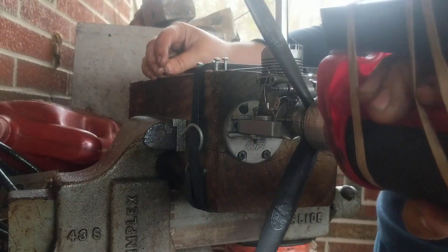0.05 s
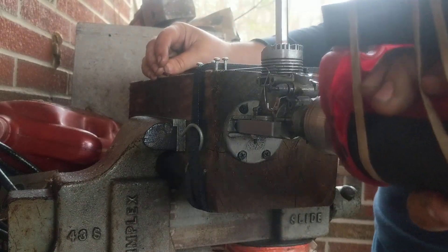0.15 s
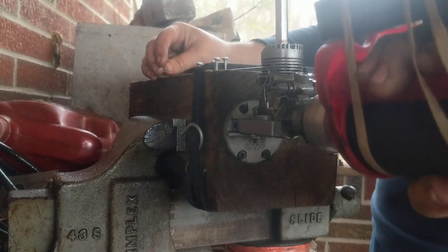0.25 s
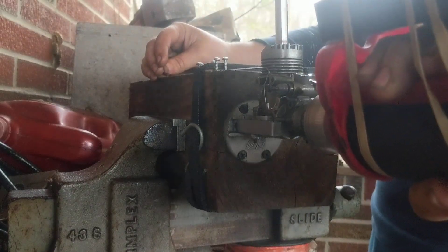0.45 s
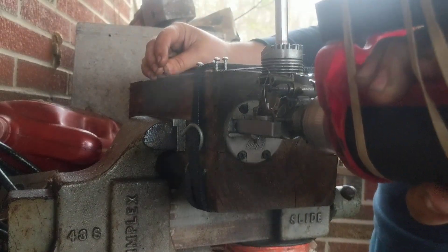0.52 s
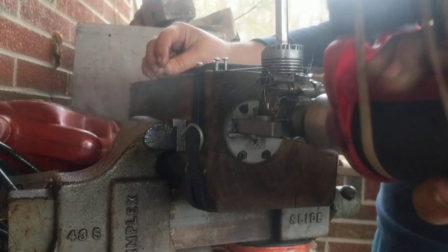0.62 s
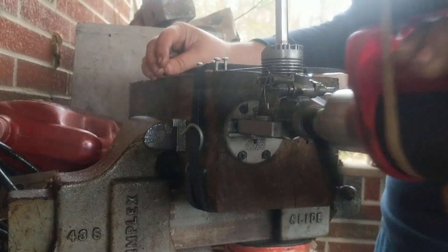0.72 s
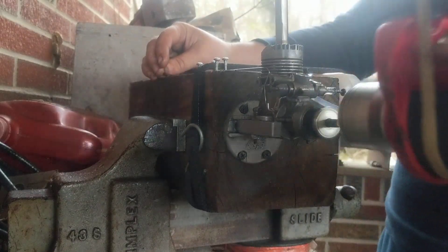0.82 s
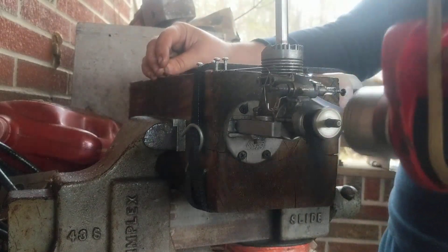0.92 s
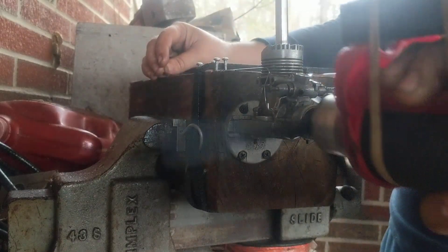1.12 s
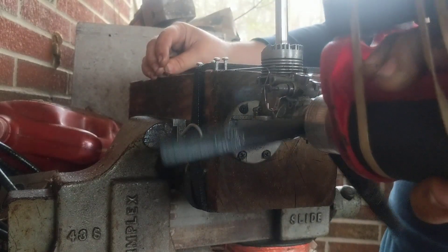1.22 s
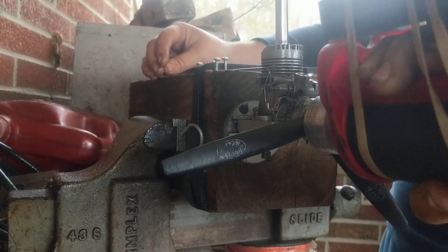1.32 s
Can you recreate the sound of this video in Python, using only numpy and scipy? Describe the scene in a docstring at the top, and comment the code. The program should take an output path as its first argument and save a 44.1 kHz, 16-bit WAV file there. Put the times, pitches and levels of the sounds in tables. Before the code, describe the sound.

A small model engine sputters briefly, close up in a quiet workshop. At 0.2 seconds a switch clicks faintly and an electric starter whirrs, squealing around 0.4 seconds. Rapid, hissing pops run from 0.3 to 0.8 seconds, the hardest slightly overloading the microphone. The pops then slow and fade under faint falling whines. Around 1.2 to 1.3 seconds the propeller settles with a few clacks and dull thumps.

```python
"""In a quiet workshop a switch clicks, and a hand-held electric starter whirrs and makes the bench drone.
It spins a small model engine: each turn hisses over compression and pops from the resonant exhaust.
Early on the starter cone slips and squeals; the hardest firings overload the microphone.
The starter is pulled away and coasts with falling whines while the engine runs down.
Last, the propeller rocks to rest with a few clacks and dull thumps."""
import sys
import numpy as np
from scipy import signal
from scipy.fft import rfft, irfft
from scipy.io import wavfile
from scipy.ndimage import uniform_filter1d

SR = 44100
rng = np.random.default_rng(int(sys.argv[2]) if len(sys.argv) > 2 else 0)


def master_out(mix):
    """Clip the mix to full scale and print it as 16-bit PCM to the path in sys.argv[1]."""
    frames = np.transpose(np.atleast_2d(mix))
    ceiling = np.clip(frames, -1, 1)
    pcm = np.round(ceiling * 32767).astype(np.int16)
    wavfile.write(sys.argv[1], SR, pcm)


N = 59535
T = np.arange(N) / SR

# Turns of the engine: (t/s, pop level/dB, pulse width/ms, bark level/dB, hiss level/dB)
ENGINE_TURNS = [(0.2208, 1.5, 0.16, -0.5, -43.5), (0.248, -22, 0.23, -5, -52), (.2840, 4, 0.11, 9.5, -29),
                (0.3254, 12, 0.088, -3, -29), (0.3607, 6.5, 0.046, 3, -29), (0.3952, 2.5, 0.091, 6, -34),
                (.4260, 15, 0.068, -15, -30.5), (.4555, 2, 0.089, 5, -30), (0.4831, 15.5, 0.044, -31, -33),
                (0.5106, 3.5, 0.091, -6, -27), (0.537, 7, 0.064, 4, -30.5), (0.5648, 3.5, 0.1, 0, -29.5),
                (.5925, 5, 0.19, -9, -26.5), (0.6212, 3.5, 0.034, 8.5, -29), (.6519, 4, 0.19, 3, -27.5),
                (0.6825, 13.5, 0.066, -17, -26), (0.7166, 6, 0.18, -13, -26.5),
                (.7525, 5.5, 0.26, -14, -26.5), (0.8, 6, 0.049, 4, -26), (0.8733, -0.5, 0.11, -14, -28.5),
                (0.9041, -10, 0.21, -1, -48.5), (0.9496, -7.5, 0.18, 2.5, -46.5),
                (.9990, -34, 0.079, 0, -45), (1.042, -12, 0.19, -3, -38.5), (1.1027, -7.5, 0.53, -5.5, -55)]


def amp(db):
    """Amplitude ratio of a level in decibels."""
    return 10 ** (np.asarray(db) / 20)


def read(points, hz):
    """Interpolation of (f/Hz, value) points on a logarithmic frequency axis."""
    f, value = np.transpose(points)
    return np.interp(np.log(hz + 1), np.log(f), value)


def noise(spectrum):
    """Spectral shaping: white noise takes the given colour, at unit RMS."""
    gain = amp(read(spectrum, np.fft.rfftfreq(N, 1 / SR)))
    x = irfft(rfft(rng.standard_normal(N)) * gain, N)
    return x / x.std()


def burst(s, decay_s, rise_s=.0003):
    """Transient envelope: a rounded onset at time s, then exponential decay."""
    t = np.maximum(T - s, 0)
    return (1 - np.exp(-(t / rise_s) ** 2)) * np.exp(-t / decay_s)


def swell(s, rise_s, fall_s):
    """Envelope with exponential flanks and a rounded peak at time s."""
    t = T - s
    return 1 / np.cosh(np.clip(t / np.where(t < 0, rise_s, fall_s), -20, 20))


def tone(hz, rough, flutter_hz):
    """Random modulation: low-passed noise makes a tone's amplitude and phase flutter."""
    lowpass = signal.butter(2, flutter_hz, fs=SR, output="sos")
    flutter = signal.sosfilt(lowpass, rng.standard_normal(N) + 1j * rng.standard_normal(N))
    carrier = np.exp(2j * np.pi * np.cumsum(hz) / SR)
    return ((1 + rough * flutter / flutter.std()) * carrier).imag / np.hypot(1, rough)


def glide(points, rough, flutter_hz):
    """A randomly modulated tone following (t/s, f/Hz, level/dB) points."""
    s, hz, db = np.transpose(points)
    envelope = amp(np.interp(T, s, db)) * (T > s[0]) * (T < s[-1])
    return envelope * tone(np.interp(T, s, hz), rough, flutter_hz)


def mode(hz, db, t60):
    """Impulse response of a damped oscillator, falling 60 dB in t60 seconds."""
    return amp(db) * np.exp(-np.log(1000) * T / t60) * np.sin(2 * np.pi * hz * T)


def convolve(x, response):
    """Output of a linear system, cut to the scene's length."""
    return signal.fftconvolve(x, response)[:N]


def background():
    """Stationary noise: the faint, mostly low-pitched floor of the workshop."""
    # Spectrum of the noise floor: (f/Hz, level/dB)
    floor_spectrum = [(25, -35), (72, 1), (130, -6), (300, -11), (600, -21.5), (1200, -19.5), (2200, -37),
                      (6000, -34), (16000, -34)]
    return amp(-59) * noise(floor_spectrum)


def switch_click():
    """Impact transient: the starter's switch closes with a small, bright click."""
    # Spectrum of the click: (f/Hz, level/dB)
    click_spectrum = [(200, -22), (1200, 8), (2200, -6), (3600, -2), (5500, -18), (7600, 0), (9000, -16),
                      (16000, -30)]
    return amp(-42) * burst(.1998, decay_s=.002) * noise(click_spectrum)


def starter_whirr():
    """Amplitude-modulated noise: starter and shaft whirr with an uneven rasp."""
    # Envelope of the whirr: (t/s, level/dB)
    whirr_levels = [(.2, -67.5), (.215, -42.5), (.245, -33), (.32, -29.5), (.5, -31.5), (.7, -32),
                    (.78, -35.5), (.85, -42.5), (.95, -43), (1.1, -47), (1.22, -48.5), (1.35, -58.5)]
    # Spectrum of the whirr: (f/Hz, level/dB)
    whirr_spectrum = [(40, -33), (110, 10.5), (230, 4), (420, 7.5), (650, -0.5), (1200, 1.5), (2200, 4.5),
                      (3200, -2), (5100, -5), (5900, -26), (7800, -16), (9000, -29), (16000, -24.5)]
    rasp_db, rasp_s = 2.5, .003
    whirr = amp(np.interp(T, *np.transpose(whirr_levels))) * noise(whirr_spectrum)
    rasp = uniform_filter1d(rng.standard_normal(N), round(rasp_s * SR))
    return whirr * amp(rasp_db * rasp / rasp.std())


def bench_drone():
    """Forced vibration: the bench drones under the starter."""
    # Course of the drone: (t/s, f/Hz, level/dB)
    drone = [(.21, 112.2, -45), (.25, 110.7, -42.5), (.5, 111.6, -41.5), (.68, 105.3, -35.5),
             (.85, 106.9, -46.5), (1.0, 105.8, -50.5), (1.15, 99.5, -65)]
    return glide(drone, rough=0.35, flutter_hz=44.5)


def compression_hiss():
    """Turbulent leakage: gas hisses past the piston around each top of stroke."""
    # Spectrum of the escaping gas: (f/Hz, level/dB)
    hiss_spectrum = [(300, -13.5), (1500, 16), (2900, 6.5), (4200, 9.5), (5200, 3.5), (5900, -16),
                     (7000, -0.5), (7800, 5.5), (8700, -11.5), (12000, -8), (15500, -18)]
    gain_db, lead_s = 4.5, 0.00069
    leak = sum(amp(hiss_db + gain_db) * swell(s - lead_s, rise_s=0.0025, fall_s=0.0051)
               for s, *_, hiss_db in ENGINE_TURNS)
    return leak * noise(hiss_spectrum)


def exhaust_pops():
    """Impulse excitation: each turn's pressure pulse rings the exhaust; strong ones add a gas crack."""
    # Modes of the exhaust and its mount: (f/Hz, level/dB, T60/s)
    exhaust_modes = [(131, -32.5, 0.079), (191, -40, 0.069), (426.6, -21.5, 0.019), (724.4, -33.5, 0.067),
                     (837, -58, 0.071), (1420, -7.5, 0.0057), (1733, -17.5, 0.024), (2277, -23.5, 0.017)]
    # Spectrum of the gas crack: (f/Hz, level/dB)
    crack_spectrum = [(200, -5), (900, 14), (2500, 14), (5000, 4), (6200, -10.5), (7800, 0.5),
                      (10000, -12.5), (16000, -8)]
    crack_db, crack_growth, loss_db_per_ms = -21, 1.554, 101
    pressure, bark_drive, crack_envelope = np.zeros((3, N))
    for s, pop_db, width_ms, bark_db, _ in ENGINE_TURNS:
        pulse = np.exp(-.5 * ((T - s) * 1000 / width_ms) ** 2)
        pulse *= amp(pop_db) / pulse.sum()
        pressure += pulse
        bark_drive += amp(bark_db) * pulse
        # Gas noise needs a strong, sudden pulse.
        crack_gain = amp(crack_db + crack_growth * pop_db - loss_db_per_ms * width_ms)
        crack_envelope += crack_gain * burst(s, decay_s=0.0045)
    ringing = convolve(pressure, sum(mode(*row) for row in exhaust_modes))
    bark = convolve(bark_drive, mode(hz=1392, db=-13, t60=.018))  # hollow note of the port
    low_cut = signal.butter(2, 170, "high", fs=SR, output="sos")
    pops = bench_reflections(signal.sosfilt(low_cut, ringing + bark))
    return pops + crack_envelope * noise(crack_spectrum)


def bench_reflections(x):
    """Comb filtering: nearby surfaces return copies that interfere within a few milliseconds."""
    # Direct path and reflections from vice, bench and wall: (delay/ms, gain)
    paths = [(0, 0.47), (.59, -0.89), (2.99, -0.44), (3.86, 0.53), (4.23, 0.12), (4.97, -0.21),
             (5.75, 0.24), (6.57, 0.056), (7.85, -0.11)]
    khz = np.fft.rfftfreq(N, 1000 / SR)
    response = sum(gain * np.exp(-2j * np.pi * khz * ms) for ms, gain in paths)
    return irfft(rfft(x) * response, N)


def cone_squeal():
    """Friction-excited vibration: the starter cone slips on the spinner."""
    # Course of the squeal: (t/s, f/Hz, level/dB)
    squeal = [(.25, 5080, -55), (.3, 4830, -43), (.345, 4900, -43), (.378, 4860, -39), (.4, 4590, -30),
              (.42, 4520, -66)]
    return glide(squeal, rough=1.2, flutter_hz=160)


def low_thumps():
    """Tone bursts: a faint low thump as the loudest pop overloads the microphone; later two dull knocks."""
    # Thumps: (peak t/s, level/dB, f/Hz)
    thumps = [(.49, -48, 72), (1.203, -40.5, 115), (1.298, -27.5, 89.7)]
    # Spectrum of the low noise in each thump: (f/Hz, level/dB)
    thump_spectrum = [(30, -18), (70, -7), (130, 0), (200, 0), (300, -11), (450, -18), (1000, -24),
                      (16000, -68)]
    out = np.zeros(N)
    for s, db, hz in thumps:
        noisy_tone = np.sin(2 * np.pi * hz * (T - s)) + amp(-11.5) * noise(thump_spectrum)
        out += amp(db) * swell(s, rise_s=0.0072, fall_s=0.016) * noisy_tone
    return out


def coasting_whines():
    """Rotational tones: each whine falls in pitch as the coasting starter slows."""
    # Whines: (t/s, duration/s, start f/Hz, end f/Hz, level/dB)
    whines = [(0.801, 0.12, 605, 582, -40), (0.938, 0.16, 402.6, 305.3, -46.5),
              (1.074, 0.16, 419.3, 341, -46)]
    out = np.zeros(N)
    for s, duration, start_hz, end_hz, db in whines:
        progress = np.clip((T - s) / duration, 0, 1)
        envelope = amp(db) * np.sqrt(abs(np.sin(np.pi * progress)))
        hz = start_hz + (end_hz - start_hz) * progress
        out += envelope * tone(hz, rough=0.9, flutter_hz=61)
    return out


def propeller_clacks():
    """Impact noise: drive and propeller give short metal clacks, each with its own brightness."""
    # Impacts: (t/s, level/dB, decay time/s, spectral tilt/(dB per octave))
    clacks = [(1.166, -32, 0.002, -5.5), (1.1859, -23.5, 0.0047, -2), (1.195, -38, 0.013, -2),
              (1.263, -25, 0.0077, 0.5), (1.272, -23, .002, -10), (1.278, -24, 0.0045, -2),
              (1.285, -25.5, 0.0022, -0.5)]
    # Spectrum of a clack before tilting: (f/Hz, level/dB)
    clack_spectrum = [(100, -5.5), (350, -3.5), (580, 0), (850, -3), (1200, 5.5), (2000, -0.5), (3500, -2),
                      (5200, -8), (6300, -29), (9000, -33), (16000, -52)]
    out = np.zeros(N)
    for s, db, decay_s, tilt in clacks:
        tilted = [(hz, level + tilt * np.log2(hz)) for hz, level in clack_spectrum]
        out += amp(db) * burst(s, decay_s) * noise(tilted)
    return out


def workshop(x):
    """Reverberation: early scatter from the clutter, and a tail whose decay depends on frequency."""
    # Reverberation time of the room: (f/Hz, T60/s)
    decay_times = [(100, 0.2), (500, 0.63), (2000, 0.1), (6000, 0.2), (14000, 0.48)]
    delay_s, tail_db, scatter_db = 0.0065, -23.5, -17
    hz, t, spectra = signal.stft(rng.standard_normal(N), SR, nperseg=256)
    decay = np.exp(-np.log(1000) * t / read(decay_times, hz)[:, None])
    tail = signal.istft(spectra * decay, SR)[1][:N] * (T > delay_s)
    tail *= amp(tail_db) / np.linalg.norm(tail)
    scatter = rng.standard_normal(N) * burst(delay_s, decay_s=0.0088)
    scatter *= amp(scatter_db) / np.linalg.norm(scatter)
    return x + convolve(x, tail + scatter)


def scene():
    """Superposition: engine, starter and short transients sound in the room, over its noise floor."""
    engine = exhaust_pops() + compression_hiss()
    starter = starter_whirr() + bench_drone() + cone_squeal() + coasting_whines()
    transients = propeller_clacks() + low_thumps() + switch_click()
    return (workshop(engine + starter + transients) + background())[None]


def record(dry):
    """Saturation: the microphone flattens the loudest peaks; a low-pass filter then limits the band."""
    ceiling, knee, edge_hz = .69, 12, 16000
    clipped = dry / (1 + abs(dry / ceiling) ** knee) ** (1 / knee)
    lowpass = signal.firwin(255, edge_hz, window=("kaiser", 9), fs=SR)
    return signal.oaconvolve(clipped, lowpass[None], "same")


dry = scene()
out = record(dry)
master_out(out)
```